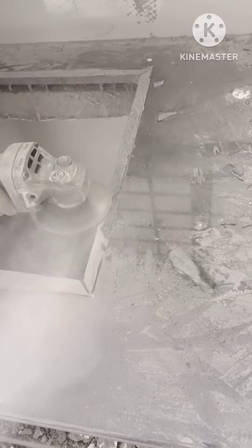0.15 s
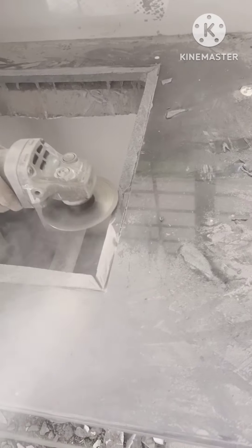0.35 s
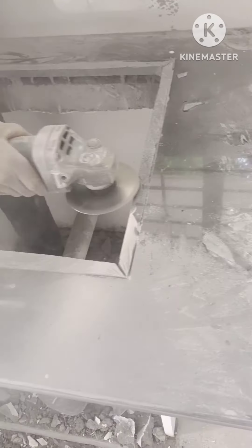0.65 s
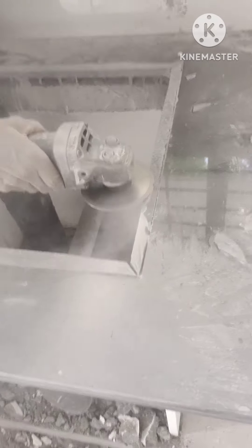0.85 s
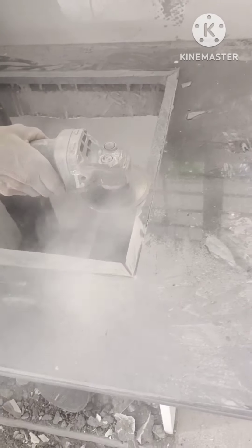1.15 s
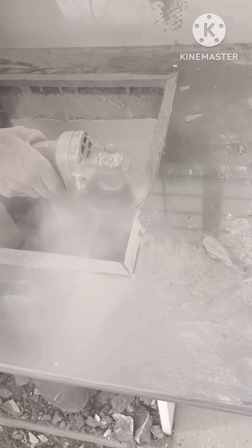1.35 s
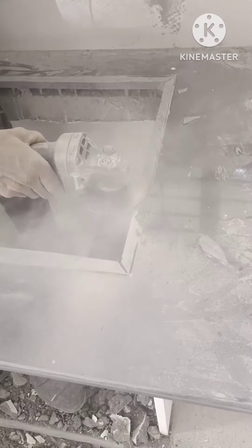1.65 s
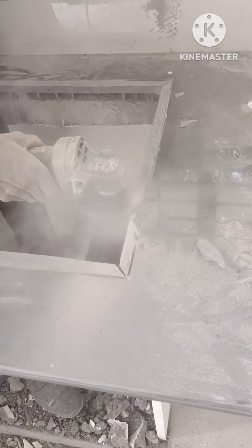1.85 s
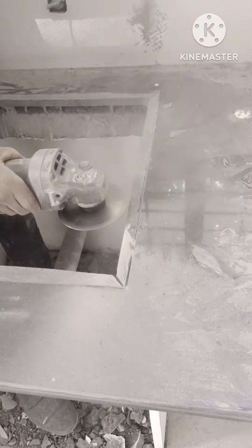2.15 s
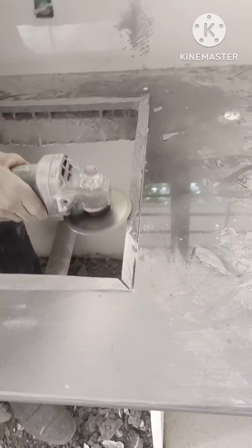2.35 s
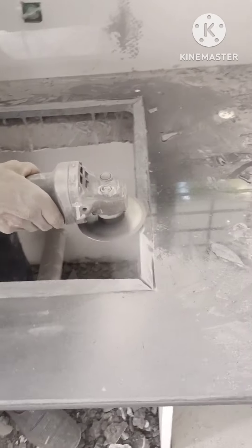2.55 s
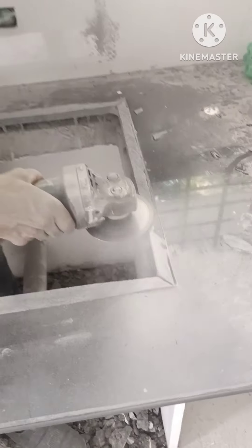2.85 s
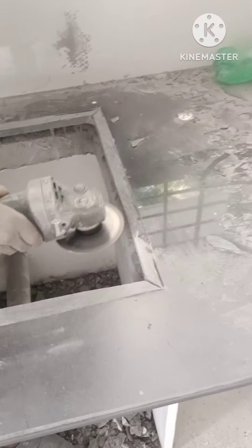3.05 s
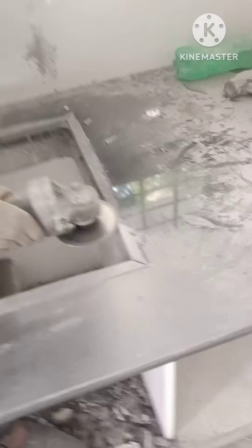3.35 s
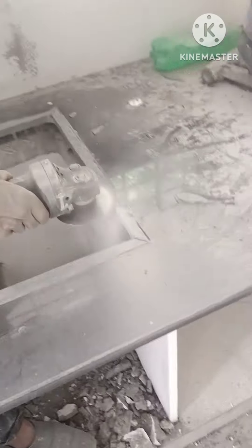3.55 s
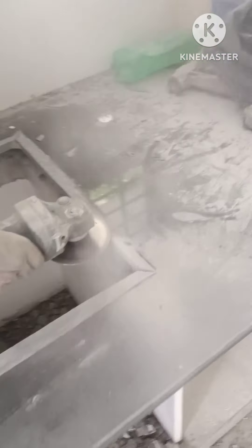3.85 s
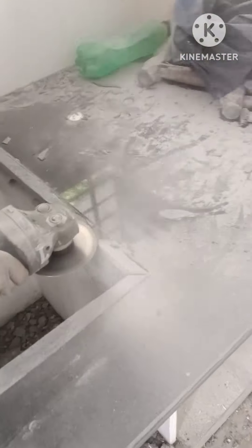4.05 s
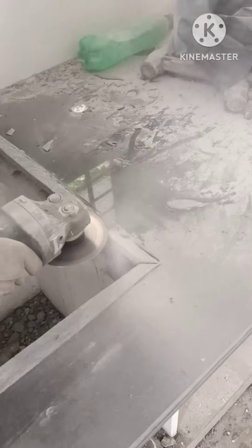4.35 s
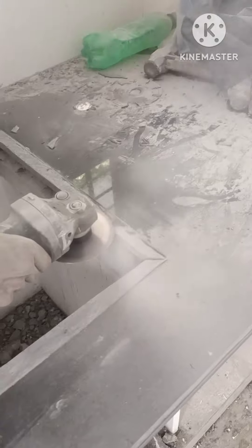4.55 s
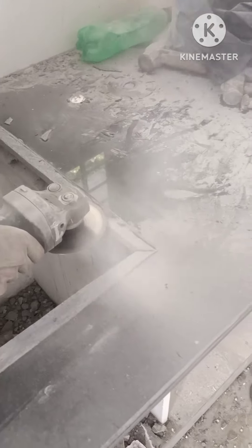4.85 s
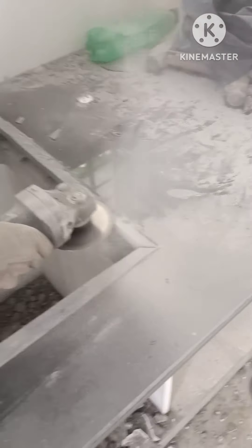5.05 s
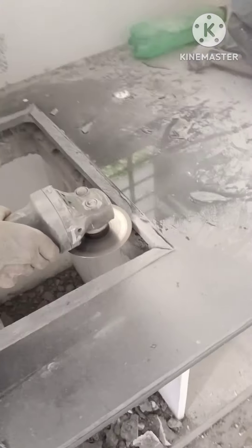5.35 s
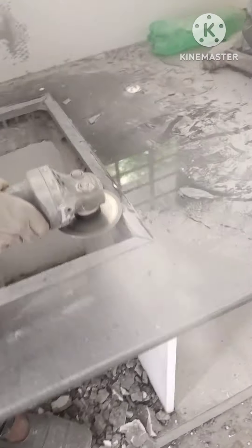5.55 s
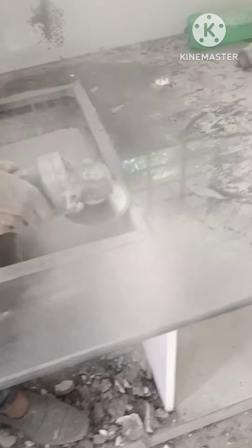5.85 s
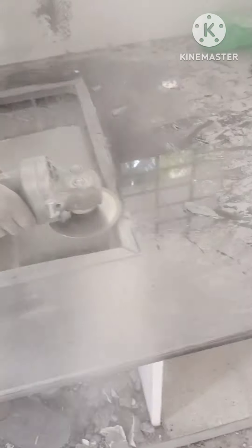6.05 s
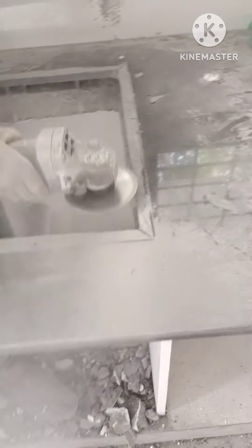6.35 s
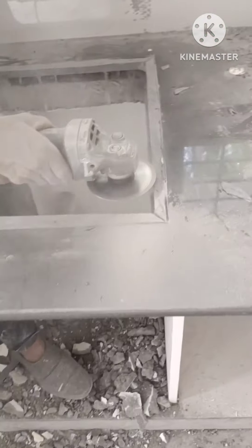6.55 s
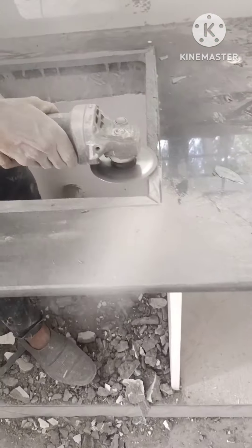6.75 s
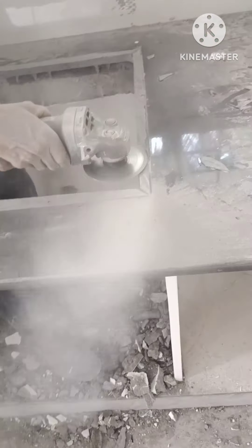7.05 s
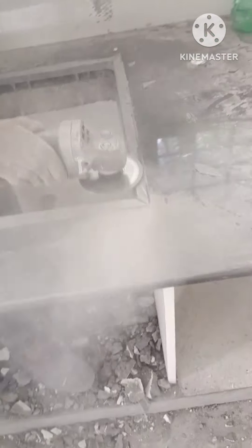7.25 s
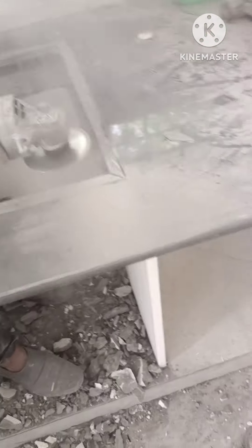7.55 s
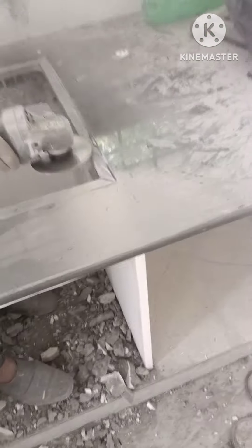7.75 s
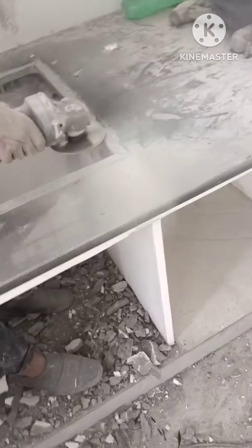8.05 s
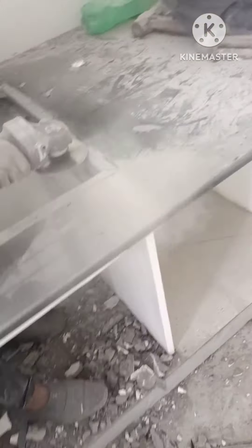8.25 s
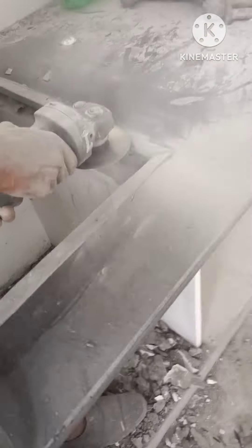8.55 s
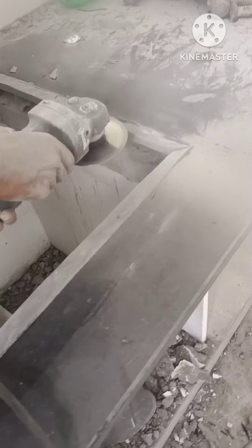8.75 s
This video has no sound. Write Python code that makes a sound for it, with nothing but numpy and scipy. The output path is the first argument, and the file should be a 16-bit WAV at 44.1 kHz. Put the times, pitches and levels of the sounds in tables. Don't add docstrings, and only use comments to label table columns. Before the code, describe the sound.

Very close to two microphones, an angle grinder presses a stone edge with harsh, bright grit hiss, ringing steel disc and overdriven rumble and crackle. Seven times it lifts for about a third of a second; the hiss stops, the motor speeds up and the fan roar swells, then the disc bites again with a sharp ring.

```python
import sys
import numpy as np
from scipy import signal
from scipy.io import wavfile
from scipy.ndimage import uniform_filter1d, minimum_filter1d

SR = 44100
rng = np.random.default_rng(int(sys.argv[2]) if len(sys.argv) > 2 else 0)


def master_out(mix):
    frames = np.transpose(np.atleast_2d(mix))
    ceiling = np.clip(frames, -1, 1)
    pcm = np.round(ceiling * 32767).astype(np.int16)
    wavfile.write(sys.argv[1], SR, pcm)


def makeup_ratio(level_db):
    decades = np.asarray(level_db, float) / 20
    return 10 ** decades


N = 392490
TIME, HZ = np.arange(N) / SR, np.fft.rfftfreq(1024, 1 / SR)
FRAMES = N // 256 + 5


def evened(x):
    return x / np.sqrt(np.mean(x ** 2, -1, keepdims=True) + 1e-20)


def curve(rows):
    s, *columns = np.transpose(rows)
    return np.array([np.interp(TIME, s, c) for c in columns])


def colour(rows, low_db=0, high_db=0):
    f, *columns = np.transpose(rows)
    below = low_db * np.log2(np.maximum(f[0] / (HZ + 1), 1))
    above = high_db * np.log2(np.maximum(HZ / f[-1], 1))
    lines = [np.interp(np.log(HZ + 1), np.log(f), c) - (below + above) for c in columns]
    return np.array(lines)[..., None]


def drift(shape, span):
    steps = rng.standard_normal(shape)
    return evened(uniform_filter1d(uniform_filter1d(steps, span), span))


def noise(gain, same=0., patchy_db=1.5, flicker_db=1.):
    a, b, c, d, *patches = rng.standard_normal((FRAMES, len(HZ), 6), dtype=np.float32).T
    patches = uniform_filter1d(np.array(patches), size=10, axis=1)
    patches = uniform_filter1d(patches, size=10, axis=2)
    same = np.clip(same, -1, 1)
    left, other = a + 1j * b, c + 1j * d
    z = np.array([left, same * left + np.sqrt(1 - same ** 2) * other])
    flicker = drift((2, 1, FRAMES), span=4)
    z *= gain * makeup_ratio(patchy_db * patches / patches.std() + flicker_db * flicker)
    return evened(signal.istft(z, nperseg=1024, noverlap=768)[1][:, :N])


# (lift time [s], touch time [s], speed at lift [turns/s], speed at touch [turns/s])
LIFTS = [
    (.38, .745, 225, 239),
    (2.12, 2.475, 229.5, 244),
    (2.96, 3.345, 239, 248.5),
    (5.11, 5.475, 227, 240.5),
    (6.34, 6.695, 228.5, 241.5),
    (7.43, 7.855, 232.5, 246),
    (8.68, 9.05, 230.5, 246),
]


def per_lift(points):
    return curve(sorted(p for row in LIFTS for p in points(*row)))


# (frequency [Hz], left level [dB], right level [dB])
GRIT = [(2530, -15.5, -6), (3160, -7.5, -0.5), (4300, -3, 0), (5600, -5, -2.5), (7000, -8.5, -3.5),
        (7740, -9, -4), (9050, -12.5, -4.5), (9850, -22, -5), (10800, -11.5, -12), (12300, -14, -8),
        (13800, -11, -12), (14250, -12, -7), (15100, -11.5, -9.5)]
# (frequency [Hz], likeness [0..1])
GRIT_SAME = [(3000, .04), (5000, 0.02), (9000, 0.046), (13000, 0.12), (15400, 0.26)]
# (frequency [Hz], width [Hz], left level [dB], right level [dB])
DISC = [(3770, 170, -4, -17), (4650, 230, -0.5, -2), (5010, 250, -3, -3), (6680, 450, 0, -2.5),
        (8390, 340, -4, -4.5), (9800, 300, -12, -14), (10230, 200, -5, -4.5), (11560, 205, -7, 3.5),
        (11900, 250, -14, -12), (12990, 320, -0.5, -0.5), (13450, 450, -6, -5), (14650, 500, -4, -8),
        (15300, 200, -10, -14)]


def grinding():
    power, sing_db = makeup_ratio(colour(GRIT, 22, 3)) ** 2, singing_db()
    for hz, width, left_db, right_db in DISC:
        shift_hz = hz + 40 * drift(FRAMES, span=20)
        shape = 1 / (1 + (2 * (HZ[:, None] - shift_hz) / width) ** 2) ** 2
        flare_db = 1.9 * drift(FRAMES, span=6) + 0.74 * drift((2, FRAMES), span=40)
        flare_db = flare_db + sing_db * (hz / 13000) ** 2
        level_db = np.array([[left_db], [right_db]]) + flare_db
        power = power + shape * makeup_ratio(level_db)[:, None] ** 2
    bite = makeup_ratio(1.3 * drift((2, N), span=30))
    hiss = noise(np.sqrt(power), colour(GRIT_SAME)[0], patchy_db=-0.04, flicker_db=0.23)
    return makeup_ratio(grit_db()) * hiss * bite / makeup_ratio(0.02)


# (time [s], pressure [dB], lean toward the left microphone [dB], disc turned toward the left [dB])
HANDS = [(.07, -0.5, 3, 3.5), (.33, 1, 2, 0), (.9, -1, 1.5, -0.5), (1.3, 0.14, 0.5, 1.5),
         (2.07, 1, -1.5, -0.5), (2.64, -0.4, -4.5, 1.5), (2.9, -0.2, -0.5, 0), (3.5, -0.45, -2.5, 0.5),
         (3.85, .3, -1, 1), (4.2, 0.5, 0, 1), (5.06, 0.9, -2.5, .5), (5.64, -0.5, 2.5, 1),
         (6.29, .2, 1.5, 3), (6.86, -1, 1.5, 0.5), (7.38, 0, -1.5, 1.5), (8.02, -.5, -1.5, 0),
         (8.3, 0, 4, 1.5), (8.63, 1, -4, -1.5)]
GRIT_DB, GRIT_OFF_DB = (-41, -37.5), -64
EASE_S, EASE_DB, RELEASE_S = 0.046, 2, 0.064
BITE_S, BITE_DB, DIP_S, DIP_DB, SETTLE_S = 0.023, -0.5, 0.16, 0, 0.48


def grit_db():
    off_db = GRIT_OFF_DB - GRIT_DB[0]
    stroke = per_lift(lambda lift, touch, *_: [
        (lift - EASE_S, 0), (lift, -EASE_DB), (lift + RELEASE_S, off_db),
        (touch - BITE_S / 2, off_db), (touch + BITE_S / 2, BITE_DB),
        (touch + DIP_S, -DIP_DB), (touch + SETTLE_S, 0)])
    pressure_db, _, turned_db = curve(HANDS)
    return np.array(GRIT_DB)[:, None] + stroke + pressure_db + np.outer([1, 0], turned_db)


def singing_db():
    ring = per_lift(lambda lift, touch, *_: [(touch - .1, 0), (touch, 4.5), (touch + 0.25, 0)])[0]
    return ring[np.minimum(np.arange(FRAMES) * 256, N - 1)]


# (frequency [Hz], left level [dB], right level [dB])
RUMBLE = [(25, -31, -26), (60, -1, -1.5), (120, -3, -8), (224, 0.2, -0.5), (432, -3, -2.5),
          (720, -0.8, 1.5), (893, -6, -6), (1065, -11.5, -13)]
# (frequency [Hz], left level [dB], right level [dB])
HASH = [(830, 7.5, 6), (1260, 6.5, 3.5), (1830, 5.5, 3), (2700, 5, -1.9)]


def overdrive():
    rumble_db, hash_db = overload_levels()
    rumble = noise(makeup_ratio(colour(RUMBLE, 6, 8.5)), patchy_db=0.0, flicker_db=0.2)
    deep = signal.sosfiltfilt(signal.butter(2, 330, fs=SR, output="sos"), rumble)
    bright = np.clip((rumble_db + 49) / 7, 0, 1)
    rumble = deep * (1.5 - .5 * bright) + bright * (rumble - deep)
    rumble *= makeup_ratio(0.9 * drift((2, N), span=250))
    fizz = noise(makeup_ratio(colour(HASH, 15.5, 8.5)), patchy_db=0.17, flicker_db=1.23)
    fizz *= makeup_ratio(1.7 * drift((2, N), span=90))
    rumble *= makeup_ratio(rumble_db + 0.18) * np.clip((rumble_db + 60.0) / 4, 0, 1)
    return rumble + fizz * makeup_ratio(hash_db + 1.0) * np.clip((hash_db + 54.0) / 4, 0, 1)


# (left stop time [s], left resume time [s], right stop time [s], right resume time [s])
CLEAR = [(.378, .752, .402, .751), (2.122, 2.518, 2.144, 2.479), (2.96, 3.39, 2.978, 3.346),
         (5.255, 5.484, 5.278, 5.48), (6.354, 6.706, 6.363, 6.705), (7.445, 7.882, 7.455, 7.857),
         (8.663, 9.05, 8.703, 9.06)]
RUMBLE_FULL_DB, HASH_FULL_DB, FADE_S = (-42, -44), (-48, -46), (0.044, .022)
HASH_EARLY_S, HASH_LATE_S = (0.022, .0), (0.057, .0)
RUMBLE_LEAN, HASH_LEAN = 0.074, 1.03
LINGER_DB, LINGER_S = 5, 0.12


def overload_levels():
    pressure_db, lean_db, _ = curve(HANDS)
    clear, lifts = np.array(CLEAR), np.array(LIFTS)[:, 0]
    linger = per_lift(lambda lift, touch, *_: [
        (lift, 0), (lift + LINGER_S, -LINGER_DB), (touch - .1, -LINGER_DB), (touch - .05, 0)])[0]
    rumble_db, hash_db = [], []
    for mic in (0, 1):
        stop, resume = clear[:, 2 * mic], clear[:, 2 * mic + 1]
        fizz_stop = np.minimum(stop, lifts + .025) - HASH_EARLY_S[mic]
        fizz = zip(fizz_stop, resume + HASH_LATE_S[mic])
        rumble_db.append(RUMBLE_FULL_DB[mic] + overload_db(zip(stop, resume), FADE_S[mic]) + linger)
        hash_db.append(HASH_FULL_DB[mic] + overload_db(fizz, FADE_S[mic]))
    rumble_db = np.array(rumble_db) + pressure_db + np.outer([RUMBLE_LEAN, 0], lean_db)
    rumble_db = rumble_db + np.outer([1, 0], stutter_db())
    return rumble_db, np.array(hash_db) + pressure_db + np.outer([HASH_LEAN, 0], lean_db)


SNAP_S, SURGE_DB, SURGE_S, SILENT_DB = 0.015, 3.5, 0.092, 16.5


def overload_db(spans, fade_s):
    return curve([p for stop, resume in spans for p in
                  [(stop - fade_s / 2, 0), (stop + fade_s / 2, -SILENT_DB),
                   (resume - SNAP_S / 2, -SILENT_DB), (resume + SNAP_S / 2, SURGE_DB),
                   (resume + SURGE_S, 0)]])[0]


# (time [s], length [s], level [dB])
STUTTERS = [
    (0.772, 0.018, -12),
    (3.352, .02, 13.5),
    (5.13, .025, -10),
    (5.51, .04, -6),
]


def stutter_db():
    return sum(db * np.clip(2 - 4 * abs(TIME - s) / length, 0, 1) for s, length, db in STUTTERS)


# (frequency [Hz], left level [dB], right level [dB])
ROAR = [(169, -28, -23.5), (398, -19.5, -19), (810, -14.5, -9.5), (1150, -12.5, -9.5), (1900, -8.5, -11),
        (2700, -11, -9), (3430, -1.5, -3.5), (3900, 2.5, -5.5), (4610, 2, -2), (5670, -7.5, -1),
        (6200, -0.5, -7), (10550, -10, 3), (12800, -7.5, 0), (14600, -9.5, -11)]
# (frequency [Hz], likeness [0..1])
ROAR_SAME = [(100, 0.99), (600, .75), (1500, 0.56), (2500, 0.047), (3500, 0.032), (15000, 0.026)]
# (multiple of speed, left level under the roar [dB], right level under the roar [dB], blur [Hz], waver [dB])
ORDER_TONES = [(1.08, -31, -30, 2, 2), (4, -23, -22, 7, 3), (8, -22.5, -24.5, 14, 4),
               (17.55, -17, -23, 55, 4.5), (21, -24, -21, 50, 3)]


def motor():
    sound = noise(makeup_ratio(colour(ROAR, 10, 1.6)), colour(ROAR_SAME)[0], patchy_db=2.0, flicker_db=0.8)
    turns = speed()
    load_db = 0.21 * (grit_db() + 62.5)
    for (multiple, left_db, right_db, blur_hz, waver_db), tilt_db in zip(ORDER_TONES, tilts_db()):
        hz = multiple * turns + blur_hz * drift(N, span=600)
        lag = np.array([[0], [multiple / 40]])
        tone = np.sqrt(2) * np.sin(2 * np.pi * (np.cumsum(hz) / SR + lag))
        level_db = np.array([[left_db], [right_db]]) + tilt_db - load_db
        sound = sound + tone * makeup_ratio(level_db + waver_db * drift(N, span=1200))
    return makeup_ratio(roar_db()) * sound


SAG_S, SPURT = .3, .45


def speed():
    after = [row[2] for row in LIFTS[1:]] + [LIFTS[-1][2]]
    points = []
    for (lift, touch, slow, fast), loaded in zip(LIFTS, after):
        freed = lift + .04
        points += [(freed, slow), (freed + (touch - lift) / 3, slow + SPURT * (fast - slow)),
                   (touch, fast), (touch + SAG_S, loaded)]
    return curve(points)[0]


# (left roar peak [dB], right roar peak [dB], shaft whine [dB],
# its octave [dB], gear whine [dB])
HOLDS = [
    (-34.5, -34.5, 1, 2, 2),
    (-34.5, -35, -12, 3, 4),
    (-33.5, -34, -4, 1.5, -2),
    (-35, -34.5, 3, -3, -1),
    (-35, -35.5, 3, 3, 3),
    (-33, -34, 3.5, -4, 3),
    (-34, -33.5, 1.5, 3, -5),
]
ROAR_LOW_DB, ROAR_LOADED_DB = (-46, -45.5), (-50, -47.5)
SWELL_FROM_S, SWELL_ENDS_S, BOW_AT, BOW_SHARE = 0.057, 0.023, 0.49, .65
DUCK_FROM_S, DUCK_DB, DUCK_S = 0.014, 1.5, .13


def roar_db():
    low, rows = np.array(ROAR_LOW_DB), []
    for (lift, touch, *_), hold in zip(LIFTS, HOLDS):
        start, end, peak = lift + SWELL_FROM_S, touch - SWELL_ENDS_S, np.array(hold[:2])
        duck = touch + DUCK_FROM_S
        rows += [(start, *low), (start + BOW_AT * (end - start), *(low + BOW_SHARE * (peak - low))),
                 (end, *peak), (duck, *(peak - DUCK_DB)), (duck + DUCK_S, *ROAR_LOADED_DB)]
    return curve(rows)


# (level at lift [dB], level at touch [dB])
TILT = [(-3.5, -6), (-10, -6.5), (-3.5, -3), (-12, 6.5), (-1, 0)]
WHINE = [(0, 0, 0), (1, 0, 0), (0, 1, 0), (0, 0, 1), (0, 0, 0)]


def tilts_db():
    swing = per_lift(lambda lift, touch, *_: zip((lift + .07, touch - .1), *TILT))
    held = curve([(s, *hold[2:]) for (lift, touch, *_), hold in zip(LIFTS, HOLDS) for s in (lift, touch)])
    return swing + np.array(WHINE) @ held


# (time [s], length [s], frequency [Hz], level [dB])
HUMS = [
    (2.17, .14, 932, -66),
    (2.343, .13, 935, -62),
    (3.2, .13, 955, -66),
    (5.395, .085, 316, -59),
    (8.752, 0.14, 650, -71.5),
    (8.84, 0.076, 327, -70),
]


def housing():
    total = 0
    for s, length, hz, db in HUMS:
        swell = np.sin(np.pi * np.clip((TIME - s) / length, 0, 1)) ** .5
        total = total + swell * makeup_ratio(db) * np.sqrt(2) * np.sin(2 * np.pi * hz * TIME)
    return total


def scene():
    return grinding() + overdrive() + motor() + housing()


# (frequency [Hz], level [dB])
STARVE = [(2300, -3), (2800, -.5), (3300, -3), (5000, -2), (5450, 2.5), (5900, -3), (13700, -2),
          (14250, 2.5), (14800, -.5)]


def starved(x):
    lead = 1024 - 33
    frame = dict(window="cosine", nperseg=2048, noverlap=1024)
    hz, _, z = signal.stft(np.pad(x, ((0, 0), (lead, 0))), SR, **frame)
    power = uniform_filter1d(abs(z) ** 2, size=2, axis=2)
    loudness = power[:, (hz > 3000) & (hz < 8000)].mean(1, keepdims=True)
    blotch = uniform_filter1d(drift(z.shape[1:], span=2), size=14, axis=0)
    sooner_db = np.interp(hz, *np.transpose(STARVE))[:, None] + 2.6 * blotch / blotch.std()
    limit = loudness * makeup_ratio(-11.6 + sooner_db + .9 * rng.standard_normal(loudness.shape)) ** 2
    weak = (uniform_filter1d(power, size=6, axis=1) < limit) & (hz > 2200)[:, None]
    kept = minimum_filter1d(1. * ~weak, size=6, axis=1)
    kept = minimum_filter1d(kept, size=2, axis=2, origin=-1)
    edge_hz = 15520 - 300 * (drift(loudness.shape, span=2) > 1.1)
    z = z * kept * (hz[:, None] < edge_hz)
    return signal.istft(z, SR, **frame)[1][:, lead:lead + N]


def low_pass(x):
    return signal.sosfilt(signal.butter(12, 15750, fs=SR, output="sos"), x)


def record(dry):
    mix = starved(dry)
    return low_pass(mix)


dry = scene()
out = record(dry)
master_out(out)
```